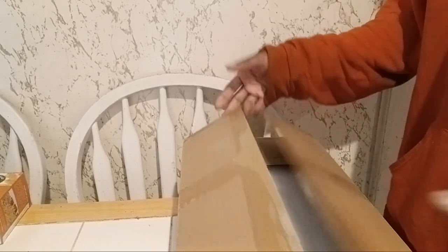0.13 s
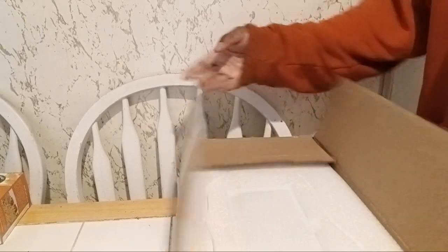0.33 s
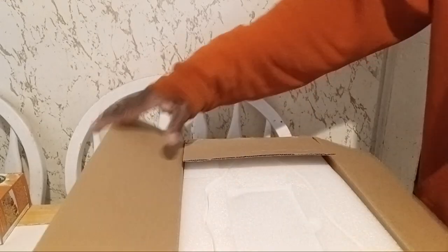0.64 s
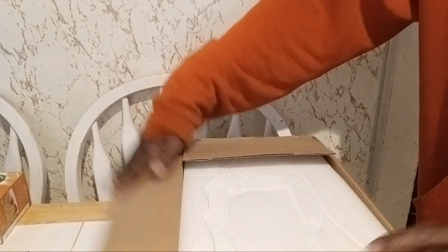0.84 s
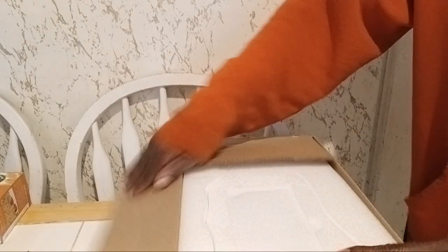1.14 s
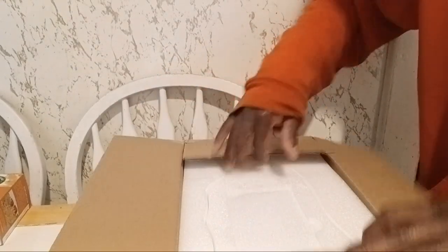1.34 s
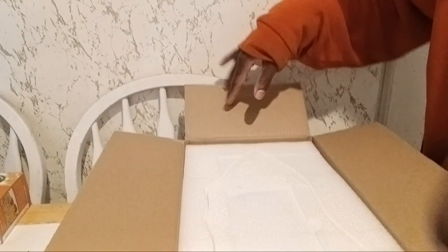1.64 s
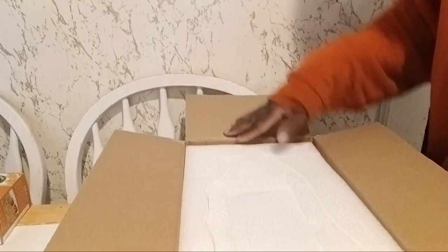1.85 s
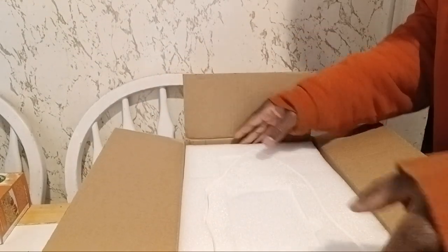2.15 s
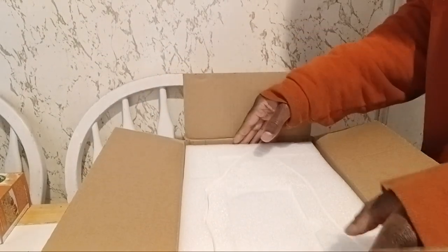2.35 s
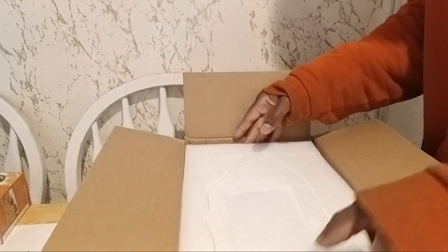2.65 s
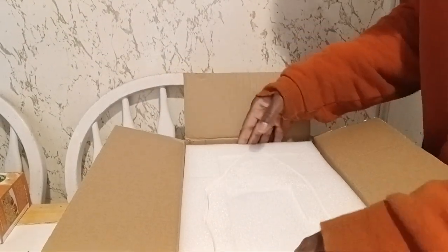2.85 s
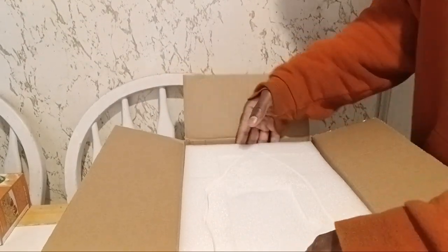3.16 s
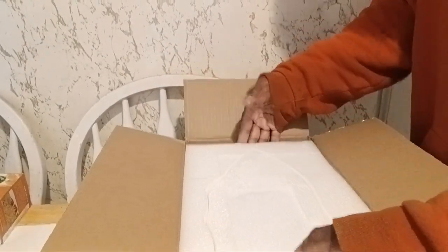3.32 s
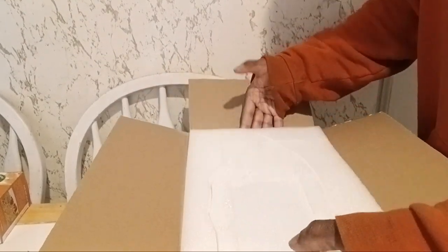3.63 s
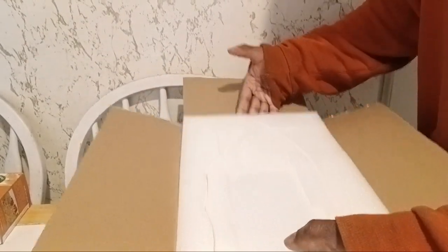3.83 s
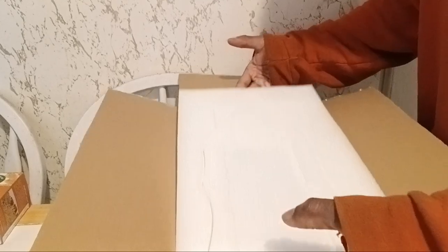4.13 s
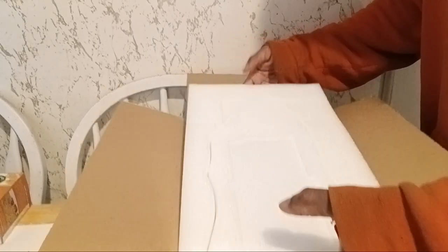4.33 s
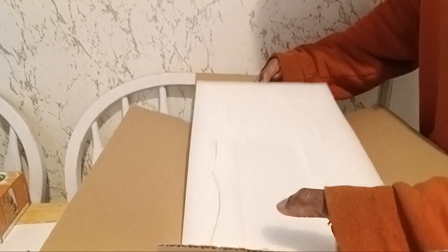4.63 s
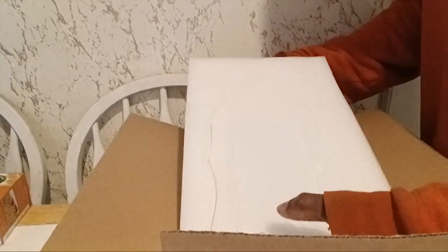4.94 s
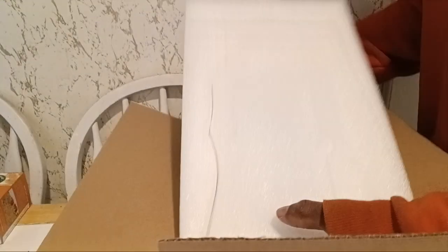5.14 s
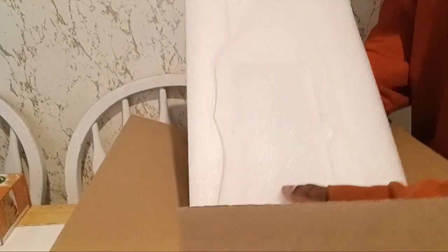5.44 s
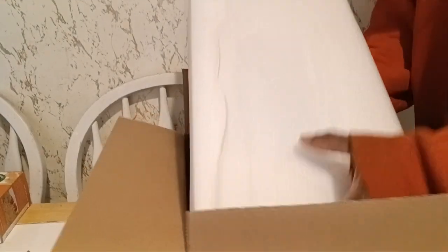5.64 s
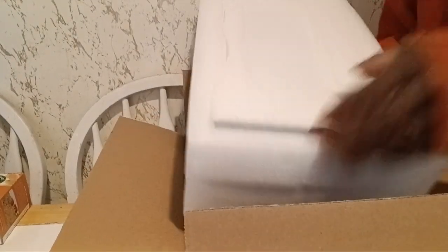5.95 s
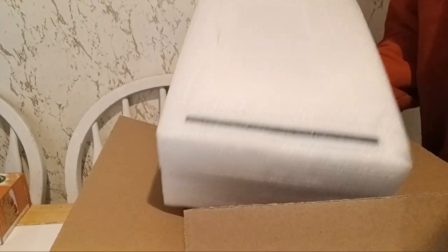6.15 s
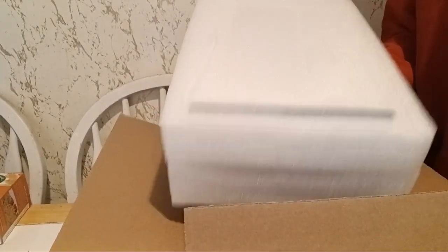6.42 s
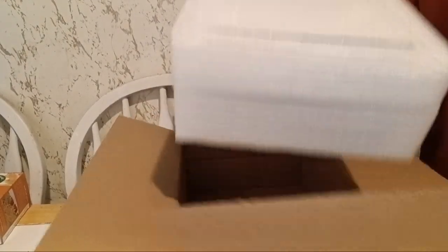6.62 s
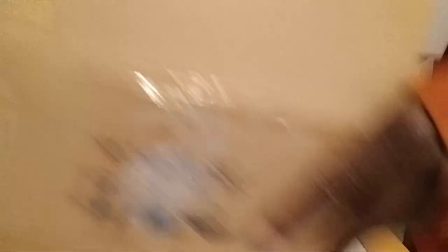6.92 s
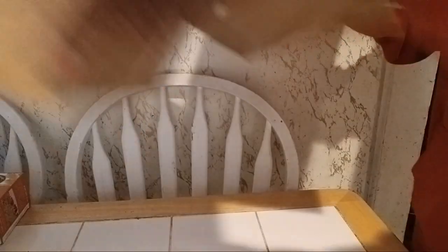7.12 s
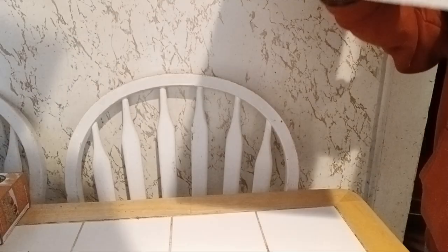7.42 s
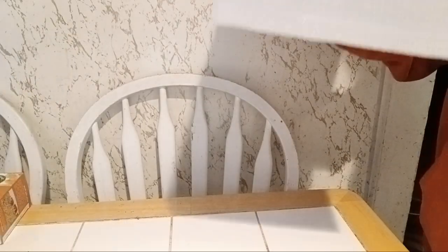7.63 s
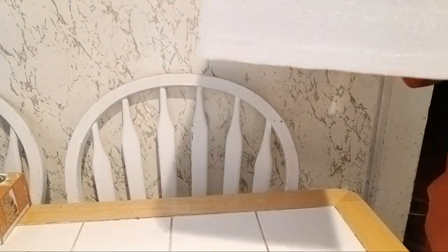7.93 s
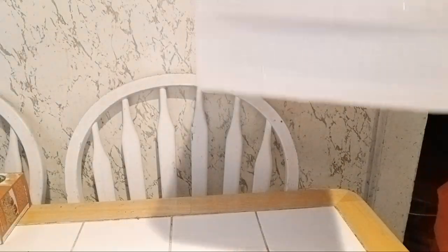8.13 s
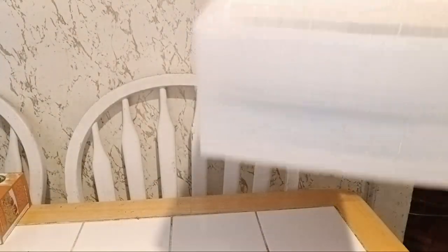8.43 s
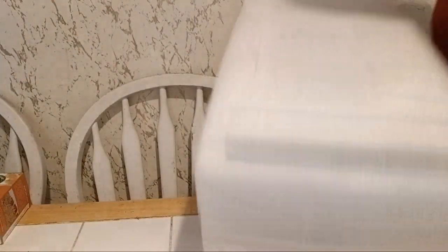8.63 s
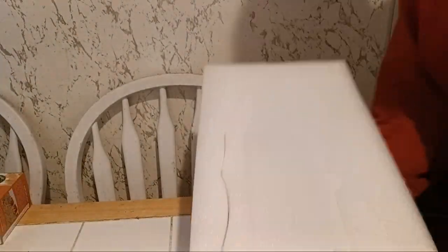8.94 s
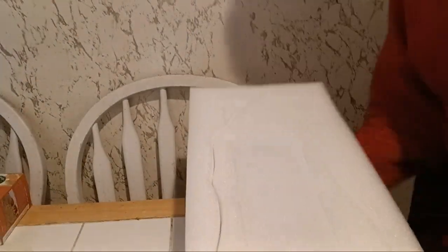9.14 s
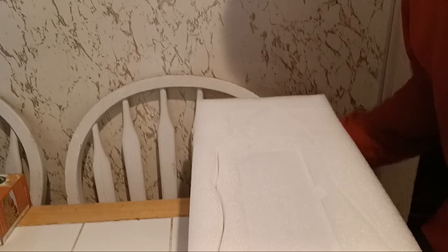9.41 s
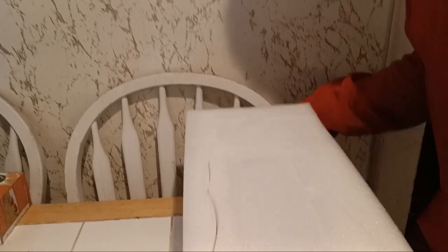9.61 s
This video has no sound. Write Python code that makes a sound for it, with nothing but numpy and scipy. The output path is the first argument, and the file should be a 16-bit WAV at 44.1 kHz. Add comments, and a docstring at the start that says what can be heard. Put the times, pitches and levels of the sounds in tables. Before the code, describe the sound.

A small quiet room with short, sparse echoes and a faint steady tone, heard very close in stereo. From 0 to 2.9 s, cardboard flaps are folded back: uneven gritty scuffs, hollow low knocks clustered around 0.3-0.8 s and again at 1.6-2.6 s, with sharp creases snapping near 1.2, 1.9 and 2.6 s. From 3.1 s a tight foam block drags upward with a fine hiss and woody rasp, swelling to a resonant pop at 4.2 s. More rubbing follows, then a second, rougher pull from 4.85 to 5.7 s, with two strong box thumps at 5.1 and 5.5 s. Light scrapes, squeaky rubs and small knocks continue from 6.1 to 8.1 s. At 8.35 s the empty box crashes to the floor, the loudest event, a booming, rattling cluster lasting about 0.3 s. Softer foam slides follow, with dull knocks at 9.35 and 9.7 s.

```python
"""Hands fold back the flaps of a cardboard box on a kitchen table: gritty stick-slip noise, blows and snaps.
A tight block of packing foam is dragged out in two long pulls, rasping along the walls as it drives the panels;
it pops free between them and the box thumps, struck panels sounding as sums of dying modes.
The box is swept off the table and tumbles to the floor with heavy low modes; the foam is slid into place.
A small room adds sparse echoes and a quiet tone throughout; two unlike microphone ports stand close by."""
import sys
import numpy as np
from scipy import signal
from scipy.fft import rfft, irfft, next_fast_len
from scipy.io import wavfile
from scipy.ndimage import map_coordinates

SR = 44100
rng = np.random.default_rng(int(sys.argv[2]) if len(sys.argv) > 2 else 0)


def generate_wav(sig):
    """Save sig (samples, or channels by samples) to the path in sys.argv[1] as 16-bit PCM at SR."""
    pcm = np.round(np.clip(np.atleast_2d(sig).T, -1, 1) * 32767).astype(np.int16)
    wavfile.write(sys.argv[1], SR, pcm)


N = 430857
TIME = np.arange(N) / SR  # s

# Level columns are relative: the functions that use a table may add a common offset.
# Quiet room, spectrum: hz, gain_db
ROOM_TONE = [(20, -20), (38, -19), (58, 5), (85, -17.5), (200, -18.5), (400, -25), (900, -32.5),
             (2000, -42.5), (6000, -39), (16000, -39)]
# Decay of the room's echoes: hz, t60_s
ROOM_T60 = [(100, 0.31), (300, 0.19), (1000, 0.083), (4000, 0.2), (14000, 0.14)]
# Left-right likeness of scattered sound: hz, likeness (0-1)
LIKENESS = [(100, 0.98), (250, 0.95), (700, 0.68), (1200, 0.47), (2500, 0), (8000, 0), (16000, 0.4)]
# Microphone ports, frequency response: hz, gain_db
LEFT_PORT = [(15, -18.5), (45, -0.5), (4000, 1.5), (6500, 4), (8000, 4.5), (9000, 3.5), (10300, -6.5),
             (13000, -12), (16000, -13.5)]
RIGHT_PORT = [(15, -22.5), (45, -1), (4000, 1.5), (6500, 3), (8000, -1.5), (9300, 3), (10200, 9),
              (11300, 2), (13000, -4.5), (16000, -12.5)]
# Faint hums while things are shifted: start_s, length_s, level_db, first_hz, last_hz
HUMS = [(5.961, 0.15, -60, 649, 602), (7.236, 0.079, -57, 950, 1030), (7.678, 0.16, -59, 591, 676)]
# Table and floor take the whole weight of the box: start_s, level_db, pitch_hz, t60_s
LANDINGS = [(0.241, -37.5, 59, 0.42), (2.012, -34, 72.4, 0.11), (5.107, -19.5, 67, 0.15),
            (5.479, -14, 89, 0.066), (6.84, -50, 62, 0.18), (7.166, -32, 96, 0.094), (7.25, -45, 58, 0.31),
            (8.357, -7.5, 57, 0.17), (8.5, -23.5, 51, 0.48)]
# The loudest creases cracking and edges slipping: start_s, level_db, decay_s, brightness_db_per_octave
SNAPS = [(0.332, -23, 0.0031, 5.5), (0.563, -27, 0.0036, 3), (0.912, -23.5, 0.0083, 2.5),
         (1.037, -31.5, 0.004, -7), (1.2175, -14, 0.0038, 10.5), (1.233, -44, 0.002, 10),
         (1.712, -24, 0.0021, 12), (1.882, -23.5, 0.013, 1.5), (1.899, -16.5, 0.0053, -1),
         (2.115, -36, 0.011, 3), (2.345, -30, 0.003, -4), (2.477, -29.5, 0.015, -2.5),
         (2.583, -16, 0.002, -5.5), (3.134, -32.5, 0.005, -8), (3.157, -31.5, 0.011, 2.5),
         (4.178, -20, 0.0051, 4), (4.3464, -26, 0.0024, -4), (4.491, -26, 0.0079, 24),
         (6.62, -40, 0.0038, 15), (6.89, -43, 0.0046, 1.5), (6.956, -41.5, 0.0086, 22),
         (7.18, -29, 0.0047, 5), (7.453, -25.5, 0.0018, -2), (7.535, -22.5, 0.0012, 10),
         (8.355, -19.5, 0.0064, 15), (8.423, -23.5, 0.017, 1), (8.511, -21, 0.0037, 2.5)]
# Blows on the box: start_s, thump_db, thump_hz, slap_db
KNOCKS = [(0.321, -22.5, 82.5, -32), (0.411, -25.5, 185, -23.5), (0.443, -15.5, 111.6, -47),
          (0.48, -26, 85, -24), (0.519, -23.5, 318, -20), (0.585, -25, 245, -28), (0.701, -23, 228, -24.5),
          (0.795, -24, 220, -47), (1.036, -36, 356, -32), (1.261, -24, 115, -43), (1.625, -19, 129.7, -30),
          (1.734, -29, 370, -27.5), (1.971, -29, 219, -29.5), (2.014, -17, 253, -21.5),
          (2.345, -28, 230, -28.5), (2.476, -22.5, 182, -27.5), (2.584, -25, 295, -15.5),
          (3.135, -25, 375, -23.5), (3.159, -29, 408, -29), (4.436, -23, 147, -34), (4.692, -25, 212, -22),
          (4.766, -20.5, 158, -51), (5.106, -6, 213.4, -21), (5.476, -10, 218, -29.5),
          (5.689, -34.5, 129, -37.5), (6.202, -36, 107, -25), (6.375, -32, 130, -29.5),
          (6.499, -32.5, 183, -28), (7.18, -36, 254, -30.5), (7.5, -31.5, 383, -27),
          (8.341, -8, 222.5, -12), (8.354, -1, 233, -9), (8.372, -7, 176.4, -29), (8.411, -15, 225, -26),
          (8.476, -11, 225, -23), (8.574, -18, 220, -31), (9.348, -17, 198, -24.5), (9.68, -22, 228, -35)]
# The foam comes unstuck and leaves the box ringing: start_s, thump_db, thump_hz, slap_db, thump_t60_s
POPS = [(4.189, -14.5, 202, -11.5, 0.25)]
# Modes of the board when slapped or rubbed: pitch_hz, level_db, t60_s
BOARD_MODES = [(310, -18.5, 0.12), (344, -8, 0.073), (389.5, -2.5, 0.39), (440, -6.5, 0.81),
               (520, -11, .08), (653, 5.5, 0.047), (880, 2, 0.023), (990, 6, 0.043), (1070, 2.5, 0.017),
               (1280, -15.5, 0.046), (1760, -4.5, 0.011), (2247, -9, 0.2), (2800, -6.5, 0.07)]
# Partials of a thump: multiple_of_pitch, level_db, t60_s
PANEL_PARTIALS = [(0.418, -15.5, 0.11), (1.5, -9.5, 0.11), (1.85, -6.5, 0.071), (2.598, -13, 0.094)]
# Rubbing, spectra of sliding contact, driven panels and flexing panels: hz, gain_db
HISS = [(700, -40.5), (1400, 5), (2200, 4.5), (3500, 3.5), (5000, 0.5), (7000, 0), (10000, 1.5), (16000, 0)]
RASP = [(110, -32), (210, -7.5), (330, 2), (460, 4), (620, 3), (900, 2), (1150, -2), (1600, -10),
        (2600, -15), (6000, -66)]
RUMBLE = [(20, -30), (45, -6), (80, -13.5), (130, -1.5), (190, 6), (280, 1), (420, -28), (900, -67.5)]
# The foam block's own resonances when its edges scrape: hz, gain_db
SCRAPE = [(400, -35), (750, -16.5), (950, 5.5), (1200, 3.5), (1550, -18.5), (1950, -10), (2270, 12.5),
          (2700, -5.5), (3700, -13.5), (6000, -49.5)]
# A surface slides, speeding up, holding and coming to rest:
# start_s, rise_s, hold_s, release_s, hiss_db, rasp_db, rumble_db
STROKES = [(0, 0.038, 2.9, .2, -48, -54, -71.5), (0.111, 0.056, 0.091, 0.12, -39, -56, -73),
           (0.3, .12, .15, 0.057, -32, -37, -42), (0.608, 0.073, 0.086, 0.23, -36, -45, -41.5),
           (0.868, 0.034, 0.014, 0.11, -34.5, -44.5, -42.5), (1.007, 0.08, 0.074, 0.051, -30, -43.5, -73),
           (1.154, 0.027, 0.089, 0.069, -40.5, -39.5, -53), (1.314, 0.034, .05, 0.096, -37.5, -43, -46),
           (1.447, 0.042, 0.032, 0.021, -36.5, -40, -48.5), (1.603, 0.015, 0.058, .05, -38.5, -51, -53),
           (1.644, 0.042, 0.17, 0.13, -33.5, -46.5, -60), (1.87, 0.015, 0.008, 0.05, -22.5, -33, -59.5),
           (1.913, 0.042, 0.053, 0.11, -32, -45, -52.5), (2.107, 0.0082, 0.0085, 0.21, -38.5, -46, -53.5),
           (2.373, 0.026, .03, 0.031, -46, -56, -66), (2.448, 0.022, .04, 0.28, -36, -40.5, -51),
           (2.533, 0.057, 0.1, .22, -30, -41.5, -50.5), (2.763, .14, 0.0051, 0.056, -31.5, -37.5, -48.5),
           (4.262, 0.056, 0.075, 0.12, -47, -49.5, -56), (4.422, 0.074, 0.053, 0.35, -39, -40, -48),
           (4.503, 0.2, 0.032, 0.04, -25, -31.5, -42), (5.743, 0.099, 0.03, 0.028, -26.5, -41.5, -70),
           (6.152, 0.067, 0.036, 0.1, -34, -44, -55), (6.285, .07, 0.21, .1, -38.5, -48, -50.5),
           (6.506, 0.043, 0.082, 0.028, -36.5, -50.5, -61.5), (6.578, 0.13, .36, 0.15, -56, -86, -75),
           (6.737, 0.025, 0.027, 0.083, -46.5, -72, -65), (6.82, 0.037, 0.017, 0.038, -43.5, -60, -62),
           (7.067, 0.023, .1, 0.024, -33, -46.5, -69), (7.219, 0.043, 0.016, 0.082, -50, -73, -60),
           (7.325, 0.14, .03, 0.09, -34, -40, -70), (7.802, 0.1, 0.054, 0.11, -33, -49, -69),
           (7.982, 0.015, 0.057, 0.062, -32.5, -39.5, -50.5),
           (8.075, 0.026, 0.015, 0.049, -40.5, -45.5, -49), (8.336, .01, 0.018, 0.07, -22, -20, -23.5),
           (8.406, 0.012, 0.013, 0.18, -26, -29.5, -25.5), (8.759, 0.015, 0.019, 0.039, -32, -46, -52),
           (8.834, 0.045, .015, 0.038, -31.5, -42, -53), (8.875, 0.19, 0.073, 0.18, -26.5, -32.5, -61),
           (9.342, 0.021, 0.051, .13, -33.5, -38, -47), (9.489, 0.083, 0.064, 0.056, -38, -43, -63),
           (9.631, .1, .05, .1, -25, -29, -40)]
# The two long pulls that draw the foam up the walls: time_s, sliding_level_db
FIRST_PULL = [(3.08, -59), (3.168, -47.5), (3.276, -46.5), (3.306, -40.5), (3.334, -43), (3.988, -42),
              (4.06, -34), (4.132, -36.5), (4.188, -28.5), (4.222, -31.5), (4.282, -51.5), (4.32, -72)]
SECOND_PULL = [(4.84, -65.5), (4.882, -41.5), (5.048, -36), (5.094, -42.5), (5.124, -34), (5.17, -44.5),
               (5.202, -36.5), (5.248, -40), (5.292, -33.5), (5.306, -39), (5.38, -38.5), (5.416, -27.5),
               (5.43, -37.5), (5.53, -40), (5.546, -32), (5.638, -40.5), (5.74, -64)]

# Stages of the unpacking: (from s, to s)
FOLD, DRAW, CLEAR, SHOVE = (0, 3.05), (3.05, 6.1), (6.1, 7.03), (7.03, 7.7)
SWING, TUMBLE, SETTLE = (7.7, 8.3), (8.3, 8.74), (8.74, 9.8)
RISE_POWER, RELEASE_DB = 1.53, 18  # a stroke swells as a power of time and falls this far per release length
THUMP_T60 = 0.066  # s, for every blow in KNOCKS
PUSH_S = 0.0025  # time constant with which a blow or landing builds up
TICK_DB, TICK_S, TICK_TILT_DB = -8.5, 0.0028, -7.5  # dull crack of each blow: re its slap, decay, per octave
BOOM_DB, BOOM_HZ, BOOM_T60 = -30, 69, 0.35  # whatever carries the box booms in step with each thump
PORT_LAG = 41  # samples by which the left port hears later
EDGE_HZ = 16000  # band limit


def amp(db):
    """Logarithmic level: decibels to amplitude gain."""
    return 10 ** (np.asarray(db) / 20)


def unit(x):
    """Mean power: scales a signal to an rms of one."""
    return x / np.sqrt(np.mean(x ** 2) + 1e-20)


def read(points, hz):
    """Logarithmic pitch: interpolates a table on a log-frequency axis."""
    f, value = np.transpose(points)
    return np.interp(np.log(hz + 1), np.log(f + 1), value)


def add(mix, s, sound):
    """Superposition: sums a sound into the mix from a given second."""
    part = mix[..., max(round(s * SR), 0):][..., :sound.shape[-1]]
    part += sound[..., :part.shape[-1]]


def colour(x, points, size=4096):
    """Minimum phase: a causal filter derived from its spectrum's log gain."""
    log_gain = np.log(amp(read(points, abs(np.fft.fftfreq(size, 1 / SR)))))
    spectrum = np.exp(np.conj(signal.hilbert(log_gain)))
    taps = np.fft.ifft(spectrum).real[:size // 2]
    return signal.oaconvolve(np.atleast_2d(x), taps[None], axes=1)[:, :x.shape[-1]]


def scatter(pair):
    """Diffuse-field coherence: unrelated signals become most alike in the bass, as at close ports."""
    size = next_fast_len(pair.shape[1])
    a, b = rfft(pair, size)
    same = np.clip(read(LIKENESS, np.fft.rfftfreq(size, 1 / SR)), 0, 1)
    mixed = same * a + np.sqrt(1 - same ** 2) * b
    return irfft(np.array([a, mixed]), size)[:, :pair.shape[1]]


def ring(t, hz, t60):
    """Damped oscillation: one mode dying exponentially."""
    return np.sin(2 * np.pi * hz * t) * amp(-60 * t / max(t60, .005))


def room_tone(level_db):
    """Diffuse steady noise: coloured, partly coherent at the two ports."""
    noise = scatter(rng.standard_normal((2, N)))
    return amp(level_db) * unit(colour(noise, ROOM_TONE))


def room(x, build_up):
    """Reverberation: sparse reflections from table and near walls, each band dying at its own speed."""
    size = SR // 2
    reflections = rng.standard_normal((2, size)) * (rng.random((2, size)) < 3000 / SR)
    hz, t, z = signal.stft(scatter(reflections), SR, nperseg=256)
    decay = amp(-60 * t / read(ROOM_T60, hz)[:, None])
    tail = signal.istft(z * decay, SR, nperseg=256)[1][:, :size]
    tail = unit(tail * (1 - np.exp(-TIME[:size] / build_up))) / np.sqrt(size)
    return signal.oaconvolve(x, tail, axes=1)[:, :N]


def hums(level_db, width_hz):
    """Narrow-band noise: a slowly varying envelope turns a gliding carrier into a soft, blurred tone."""
    out = np.zeros(N)
    for s, length, db, first_hz, last_hz in HUMS:
        noise = rng.standard_normal(SR) + 1j * rng.standard_normal(SR)
        blur = signal.lfilter([1], [1, -np.exp(-np.pi * width_hz / SR)], noise)
        pitch = np.linspace(first_hz, last_hz, round(length * SR))
        carrier = np.exp(2j * np.pi * np.cumsum(pitch) / SR)
        tone = unit((blur[-len(carrier):] * carrier).real)
        add(out, s, amp(db + level_db) * tone * np.hanning(len(tone)))
    return out


def landings():
    """Impact on a heavy support: table or floor answers with one damped low mode."""
    out, t = np.zeros(N), np.arange(SR // 2) / SR
    push = 1 - np.exp(-t / PUSH_S)
    for s, db, hz, t60 in LANDINGS:
        add(out, s, amp(db) * ring(t, hz, t60) * push)
    return np.array([out, out])


def snaps(level_db, shared):
    """Brittle failure: a crease gives way in a burst of fibre cracks that dies within milliseconds."""
    out, t = np.zeros((2, N)), np.arange(SR // 16) / SR
    shared = np.clip(shared, 0, 1)  # share of the power common to both ports
    ticks = [(s, slap_db + TICK_DB, TICK_S, TICK_TILT_DB) for s, _, _, slap_db in KNOCKS]
    for s, db, decay, tilt in SNAPS + ticks:
        common, *own = rng.standard_normal((3, len(t)))
        cracks = np.sqrt(shared) * common + np.sqrt(1 - shared) * np.array(own)
        spectrum = [(200, -15 - 2 * tilt), (1000, -2 * tilt), (4000, 0.018), (8000, tilt), (16000, tilt)]
        burst = unit(colour(cracks, spectrum, size=512))
        add(out, s, amp(db + level_db) * burst * np.exp(-t / max(decay, .0005)))
    return out


def panel_thump(t, hz, t60):
    """Plate vibration: a pushed panel sounds its pitch and partials, while its support booms below."""
    thump = ring(t, hz, t60)
    thump += sum(amp(db) * ring(t, hz * multiple, life) for multiple, db, life in PANEL_PARTIALS)
    return thump + amp(BOOM_DB) * ring(t, BOOM_HZ, BOOM_T60)


def board_slap(t):
    """Modal excitation: the spot that is struck shifts the board's modes and their shares."""
    slap = np.zeros(len(t))
    shares, shifts = rng.uniform(-1, 1, (2, len(BOARD_MODES)))
    for (hz, db, t60), share, shift in zip(BOARD_MODES, shares, shifts):
        slap += amp(db + 1.4 * share) * ring(t, hz * (1 + .05 * shift), t60)
    return slap / abs(slap).max()


def flute_crush(t, t60):
    """Inelastic crushing: the board's flutes yield in a short decaying noise."""
    noise = colour(rng.standard_normal(len(t)), RASP)[0]
    return unit(noise) * amp(-60 * t / t60)


def knocks(thump_db, slap_db, crush_db, crush_t60):
    """Impulse response: each blow or pop thumps a panel, slaps the board and crushes its flutes."""
    out, t = np.zeros(N), np.arange(SR // 2) / SR
    short, push = t[:SR // 6], 1 - np.exp(-t / PUSH_S)
    for s, low_db, hz, high_db, t60 in POPS + [(*row, THUMP_T60) for row in KNOCKS]:
        add(out, s, amp(low_db + thump_db) * panel_thump(t, hz, t60) * push)
        slap = board_slap(short) + amp(crush_db) * flute_crush(short, crush_t60)
        add(out, s, amp(high_db + slap_db) * slap)
    return np.array([out, out])


def wander(t, per_s):
    """Random fluctuation: interpolated random knots with a spread of one."""
    knots = rng.standard_normal(4000)
    return unit(np.interp(t * per_s, np.arange(len(knots)), knots))


def grains(size, per_s, spread_db, length):
    """Stick-slip: tiny slips of very unequal size, each a short decaying burst."""
    sizes = amp(spread_db * np.minimum(rng.exponential(1, size), 3.5))
    slips = sizes * (rng.random(size) < per_s / SR)
    power = signal.lfilter([1], [1, -np.exp(-1 / (length * SR))], slips ** 2)
    return unit(np.sqrt(power) * rng.standard_normal((2, size)))


def drift(x, depth_db, lasts_s, width_hz, fade_hz):
    """Moving excitation point: resonances come and go as the contact travels over the board."""
    hz, t, z = signal.stft(x, SR, nperseg=1024, noverlap=768)
    place = np.cumsum(1 / (width_hz * np.sqrt(hz / 1000 + 0.088))) * hz[1]  # they widen towards the treble
    grid = np.meshgrid(place, t / lasts_s, indexing="ij")
    field = map_coordinates(rng.standard_normal((400, 400)), grid, order=3, mode="wrap")
    depth = depth_db * (0.17 + 0.67 / (1 + (hz[:, None] / fade_hz) ** 2))  # and there overlap and even out
    gain = amp(depth * field)
    gain /= np.sqrt(np.mean(gain ** 2, axis=1, keepdims=True))
    return signal.istft(z * gain, SR, nperseg=1024, noverlap=768)[1][:, :x.shape[1]]


def board_ring(x):
    """Sustained resonance: a stream of slips keeps the board's modes ringing."""
    t = TIME[:SR // 4]
    modes = sum(amp(db) * ring(t, hz, t60) / np.sqrt(max(t60, .005)) for hz, db, t60 in BOARD_MODES)
    return signal.oaconvolve(x, modes[None], axes=1)[:, :x.shape[1]]


def strokes(stage):
    """Power addition: overlapping strokes of one stage sum into hiss, rasp and rumble levels."""
    power = np.zeros((3, N))
    for start, rise, hold, release, *db in STROKES:
        if stage[0] <= start < stage[1]:
            t = TIME[:round((rise + hold + 3 * release) * SR)]
            swell = np.minimum(t / rise, 1) ** RISE_POWER
            fall = amp(-RELEASE_DB * np.maximum(t - rise - hold, 0) / release)
            add(power, start, (amp(db)[:, None] * swell * fall) ** 2)
    return np.sqrt(power)


def pull(curve, hiss_db, rasp_db, rumble_db, rasp_follows, rumble_follows):
    """Common drive: one sliding level moves hiss, rasp and rumble; the panels follow less keenly."""
    s, db = np.transpose(curve)
    usual = np.median(db)
    swing = np.interp(TIME, s, db) - usual
    levels = [hiss_db + swing, rasp_db + rasp_follows * swing, rumble_db + rumble_follows * swing]
    return amp(usual + np.array(levels)) * ((TIME >= s[0]) & (TIME < s[-1]))


def friction(stage, grit_db, judder_db, drift_db, ring_db, scrape_db, tilt_db, top_db, pan_db, pulls=0):
    """Dry friction: stick-slip grains in a smooth hiss drive the panels, which rasp and rumble."""
    levels = strokes(stage) + pulls
    hiss, rasp, rumble = levels[:, round(stage[0] * SR):round((stage[1] + .3) * SR)]
    t = TIME[:len(hiss)]
    grip = unit(amp(judder_db * wander(t, per_s=65)))  # the surfaces catch and let go
    slips = rng.standard_normal((2, len(t)))
    slips += amp(grit_db) * grains(len(t), per_s=420, spread_db=2.5, length=0.00043)
    # whole fibre bundles let go
    slips += amp(grit_db - 5.5) * grains(len(t), per_s=35, spread_db=2.0, length=0.0046)
    slips = unit(drift(scatter(slips), drift_db, lasts_s=.07, width_hz=121.3, fade_hz=4200))
    # tilt in dB per octave about 5 kHz; softer surfaces lose the top octave
    surface = [(hz, db + tilt_db * np.log2(hz / 5000) + top_db * (hz > 9000)) for hz, db in HISS]
    contact = hiss * unit(colour(slips, surface))
    panels = unit(colour(slips, RASP))
    panels += amp(ring_db) * unit(board_ring(slips))
    panels += amp(scrape_db) * unit(colour(slips, SCRAPE))
    flexing = rumble * unit(colour(slips, RUMBLE))
    pan = amp([[pan_db / 2], [-pan_db / 2]])
    out = np.zeros((2, N))
    add(out, stage[0], (grip * (contact + rasp * unit(panels)) + flexing) * pan)
    return out


def rubbing():
    """Surface roughness: board is gritty and uneven; foam slides with a finer, steadier hiss."""
    pulls = pull(FIRST_PULL, hiss_db=3.0, rasp_db=2.0, rumble_db=-8.5, rasp_follows=0.87, rumble_follows=0.96)
    pulls += pull(SECOND_PULL, hiss_db=4.5, rasp_db=-3.0, rumble_db=-10.5, rasp_follows=0.88,
                  rumble_follows=.3)
    out = friction(FOLD, grit_db=-4.5, judder_db=1.55, drift_db=4.0, ring_db=-29, scrape_db=-14,
                   tilt_db=4.5, top_db=0.4, pan_db=-0.5)
    out += friction(DRAW, grit_db=-11, judder_db=1.3, drift_db=4.0, ring_db=-28, scrape_db=-36,
                    tilt_db=2.36, top_db=-1.5, pan_db=-1.2, pulls=pulls)
    out += friction(CLEAR, grit_db=-3.0, judder_db=1.5, drift_db=8.0, ring_db=-47, scrape_db=-4,
                    tilt_db=5.0, top_db=0.5, pan_db=0.5)
    out += friction(SHOVE, grit_db=1, judder_db=2.0, drift_db=8.0, ring_db=-29, scrape_db=6.5,
                    tilt_db=3.5, top_db=0.0, pan_db=-2.5)
    out += friction(SWING, grit_db=-10, judder_db=0.5, drift_db=8.0, ring_db=-24, scrape_db=-7.5,
                    tilt_db=2.5, top_db=1.0, pan_db=2.0)
    out += friction(TUMBLE, grit_db=-0.5, judder_db=1.5, drift_db=4.5, ring_db=-9, scrape_db=-14.5,
                    tilt_db=6.5, top_db=-6.0, pan_db=-0.3)
    out += friction(SETTLE, grit_db=-12.0, judder_db=0.9, drift_db=4.5, ring_db=4, scrape_db=0,
                    tilt_db=2.7, top_db=-3.0, pan_db=-0.7)
    return out


def scene():
    """Superposition: rubbing, blows and snaps, with their echoes, in a small quiet room."""
    rubs = rubbing() + hums(level_db=-2.0, width_hz=27)
    blows = knocks(thump_db=0.5, slap_db=-2, crush_db=-3.5, crush_t60=0.069) + landings()
    cracks = snaps(level_db=0.5, shared=0.2)
    echoes = room(amp(-16.5) * rubs + amp(-7) * blows + amp(-9.5) * cracks, build_up=0.0014)
    return rubs + blows + cracks + echoes + room_tone(level_db=-63.5)


def record(dry):
    """Travel time and port resonance: the left port hears later, each is coloured, then band-limited."""
    left = np.pad(dry[0], (PORT_LAG, 0))[:N]
    ports = np.vstack([colour(left, LEFT_PORT), colour(dry[1], RIGHT_PORT)])
    low_pass = signal.firwin(401, EDGE_HZ, window=("kaiser", 9), fs=SR)
    return signal.oaconvolve(ports, low_pass[None], "same")


dry = scene()
out = record(dry)
generate_wav(out)
```